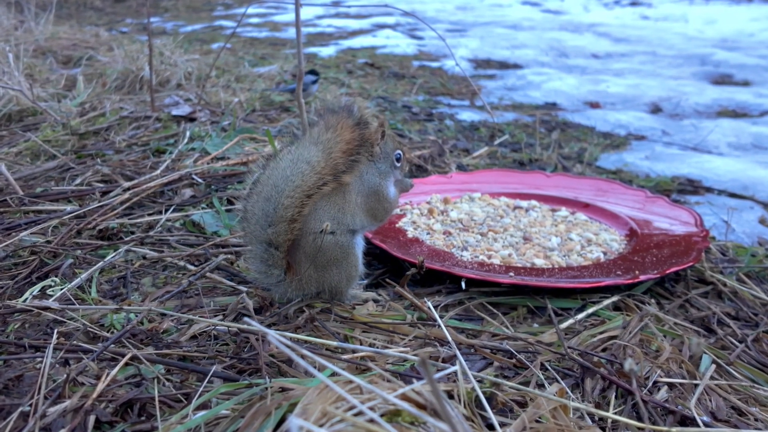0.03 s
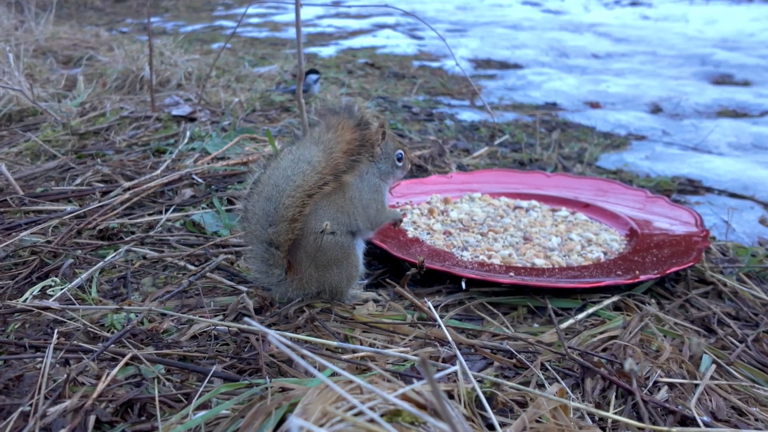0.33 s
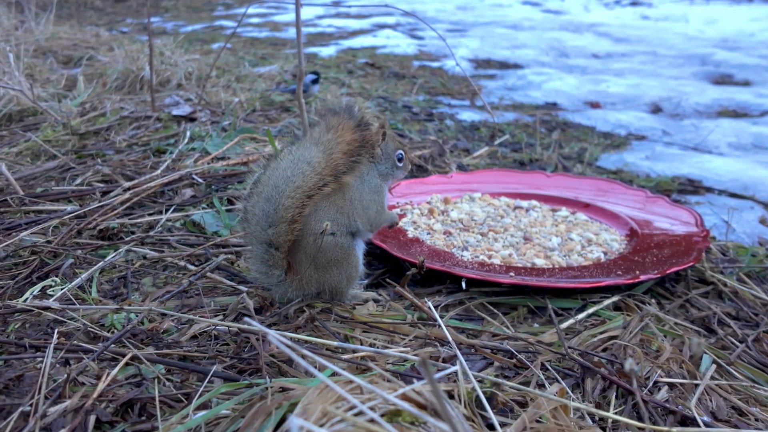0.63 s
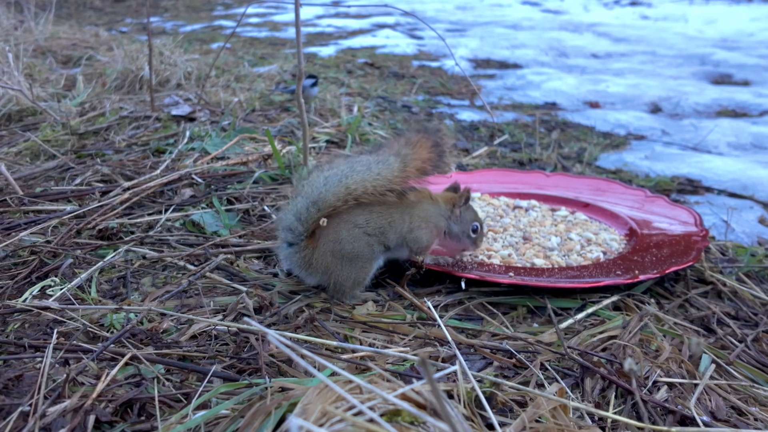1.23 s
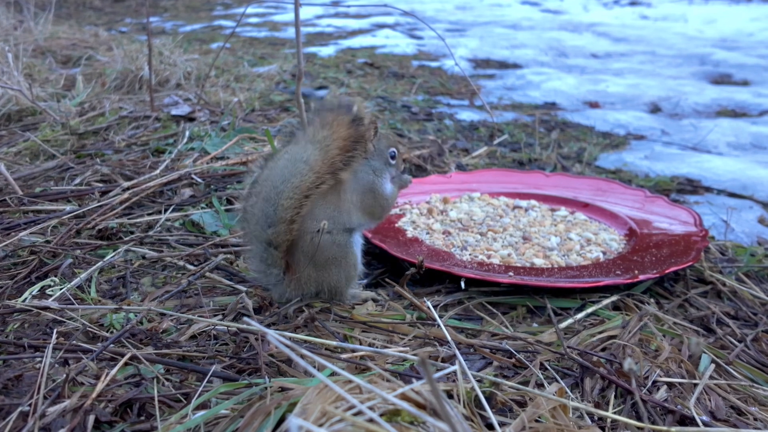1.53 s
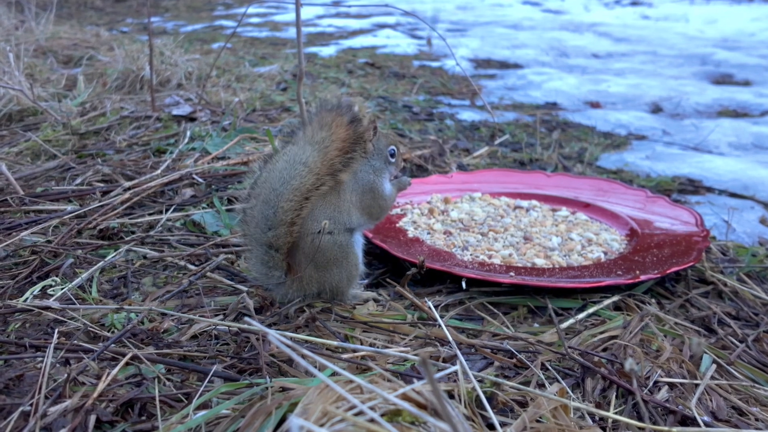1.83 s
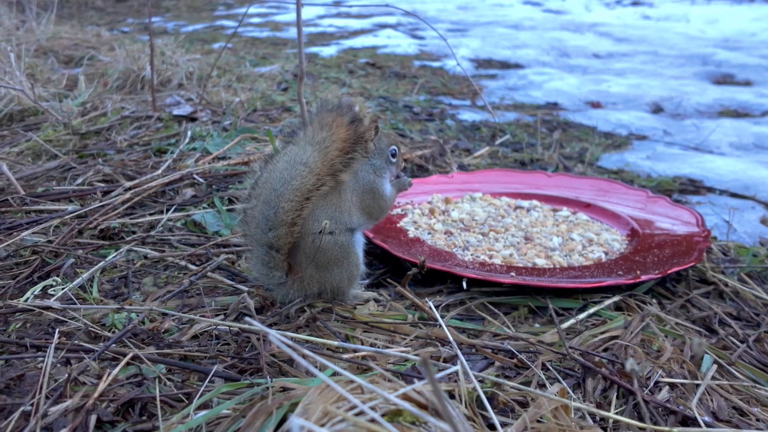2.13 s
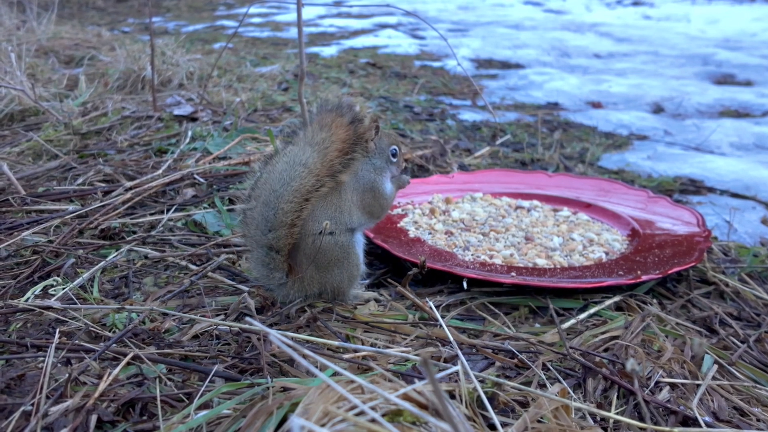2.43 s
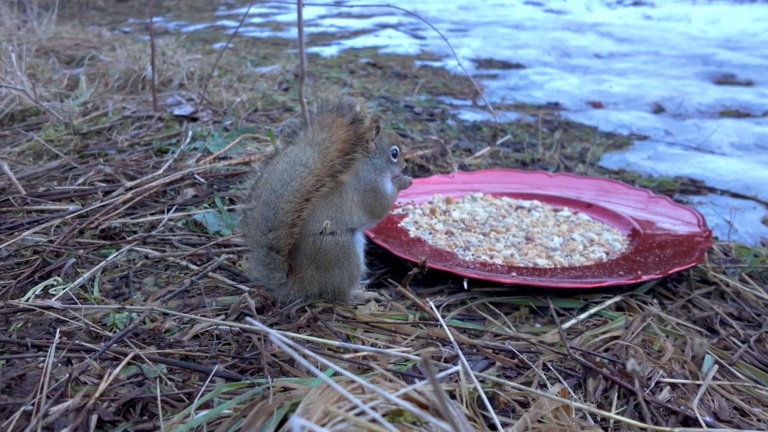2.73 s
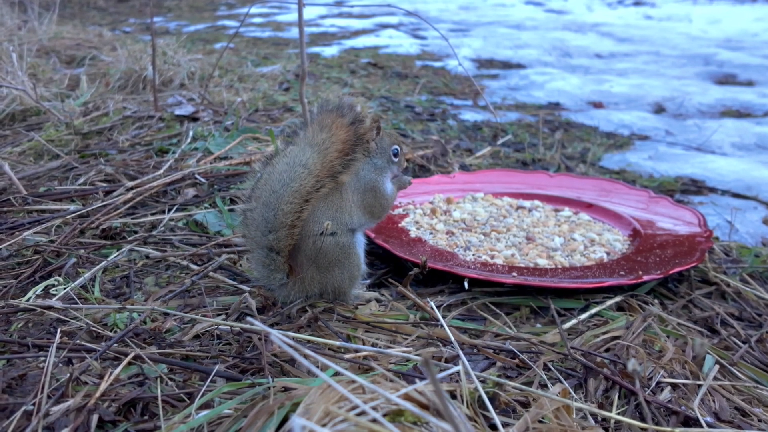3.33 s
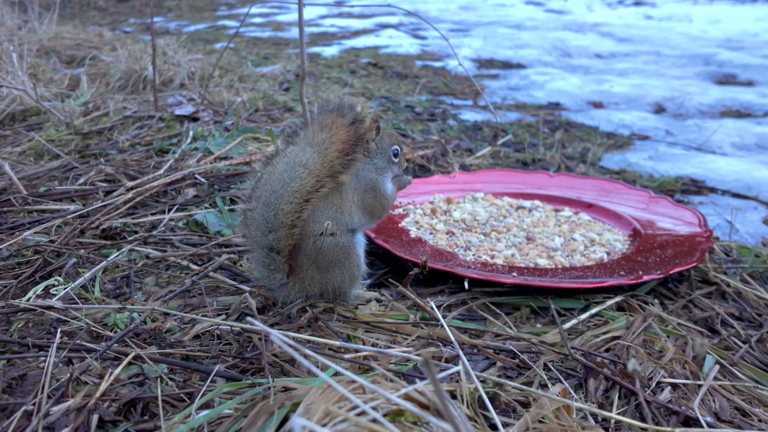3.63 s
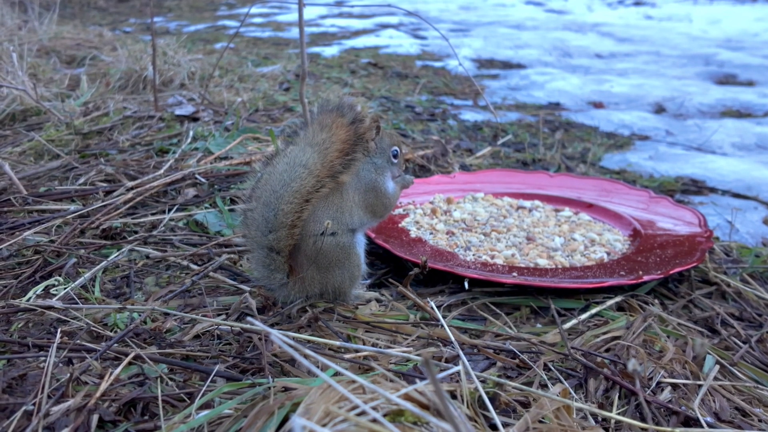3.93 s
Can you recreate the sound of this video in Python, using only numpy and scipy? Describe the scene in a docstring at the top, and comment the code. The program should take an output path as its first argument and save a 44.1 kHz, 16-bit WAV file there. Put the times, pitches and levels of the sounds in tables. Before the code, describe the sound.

A squirrel nibbles seeds with small, crisp clicks while thin bird whistles sound faintly outdoors.

```python
"""At a woodland edge, a squirrel eats seeds from a plastic dish. Husks snap and tick, shells split
with a tiny squeak and teeth rasp; paws brush dry grass and the body bumps softly on the ground.
Small birds whistle thin, high notes that rise and fall, one chips far off and one close by,
and the trunks scatter their calls. Under it all lie a distant rumble, a faint hum and a soft hiss."""
import sys
import numpy as np
from scipy import signal
from scipy.fft import rfft, irfft, next_fast_len
from scipy.io import wavfile
from scipy.ndimage import map_coordinates

SR = 44100
rng = np.random.default_rng(int(sys.argv[2]) if len(sys.argv) > 2 else 0)


def persist_wave(psi):
    """Save psi, clipped to +-1, as 16-bit WAV."""
    counts = np.round(np.clip(psi, -1, 1) * 32767).astype(np.int16)
    wavfile.write(sys.argv[1], SR, np.atleast_2d(counts).T)


N = 176400  # 4 seconds

# Husks snapping and teeth clicking as they gnaw. Each row: start in seconds, level in dB, pitch in Hz,
# brightness in dB.
BITE_TICKS = [(.4436, -46.5, 3400, -5), (.4549, -50, 3500, -12), (.494, -55, 3400, 1),
              (.6852, -57, 3390, 4), (0.8025, -54, 3470, 0), (.983, -57, 3400, 11),
              (1.1085, -52.5, 4600, -2), (1.1896, -47.5, 4930, -7), (1.579, -52.5, 3220, 0),
              (1.6563, -47.5, 3520, -6), (1.697, -57, 3450, 4), (1.756, -53, 2680, -1),
              (1.772, -49, 2540, -7), (1.811, -45, 3140, -9), (1.8485, -48, 2690, -12),
              (1.886, -48, 2920, -8), (2.043, -63, 3950, 17), (2.164, -46, 3360, 4.5),
              (2.359, -45.5, 3160, -9), (2.4495, -48.5, 3380, -9), (2.511, -61.5, 4000, 12),
              (2.5346, -48.5, 3300, -6), (2.713, -45.5, 3330, -3), (2.7223, -45.5, 3070, -1),
              (2.728, -48, 3080, 0), (2.746, -52, 3580, -9), (2.9332, -54, 3280, 6),
              (3.199, -53.5, 3460, 8), (3.4767, -53, 3000, -7), (3.5732, -42.5, 3300, -12),
              (3.6965, -38.5, 3220, -2), (3.78, -50.5, 3600, -6), (3.784, -49, 3640, -1),
              (3.797, -51, 3130, -4)]
# The tones a husk rings with. Each row: multiple of the pitch, level in dB, fade time in seconds.
# A tick's brightness then shifts the upper tones' levels and all the fade times.
HUSK_TONES = [(1, -1, 0.00022), (1.75, -5, 0.00015), (2.7, -8, 0.000058)]


def bite_ticks(crumb_count=64, crumbs_per_s=15):
    """A snapping husk or clicking tooth rings for a few cycles; sharper bites are shorter and wake its upper
    tones."""
    t, out = np.arange(SR // 40) / SR, np.zeros(N + SR)
    crumbs = []  # fainter ticks at random times
    for place, (loud, high, sharp) in zip(rng.random(crumb_count), rng.standard_normal((crumb_count, 3))):
        start = place * crumb_count / crumbs_per_s % (N / SR)
        crumbs.append((start, -61.5 + 1.5 * loud, 3300 * np.exp(0.092 * high), 3 * sharp - 4))
    for start, db, hz, bright_db in BITE_TICKS + crumbs:
        age = t * np.exp(bright_db / 57)  # brighter ticks die sooner
        ring = np.zeros(len(t))
        for k, (ratio, tone_db, fade_s) in enumerate(HUSK_TONES):
            gain = amp(tone_db + bright_db * (k > 0))
            envelope = (age / fade_s / 2) ** 2 * np.exp(2 - age / fade_s)
            ring += gain * envelope * np.sin(2 * np.pi * (hz * ratio * t + rng.random()))
        scatter = rng.standard_normal(len(t)) * np.exp(-t / .003)  # a short, noisy tail
        tail = np.convolve(ring, scatter / np.linalg.norm(scatter))[:len(t)]
        out[int(start * SR):][:len(t)] += amp(db) * (ring + .225 * tail)
    return out[:N]


# Shells splitting. Each row: start in seconds, length in seconds, level in dB.
SHELL_CRACKS = [(.499, 0.0071, -50.5), (.8555, .003, -64), (0.894, 0.005, -62.5), (2.591, 0.0068, -65)]
# A crack's colour (how strong its lows and highs are). Each row: frequency in Hz, boost or cut in dB.
CRACK_COLOUR = [(1200, -23), (2600, 4), (4300, 0.5), (7500, 0.5), (10300, 2.5), (12000, -8.5), (15500, -31)]


def shell_cracks(slip_hz=3220, slowing_s=0.0103, grit_db=-9):
    """A shell splits in a few milliseconds of rapid, slowing slips: a tiny falling squeak."""
    t, out = clock(), np.zeros(N)
    for start, length, db in SHELL_CRACKS:
        age = np.clip(t - start, 0, length)
        slip_rate = slip_hz * np.exp(-age / slowing_s) * (1 + .04 * wobble(900))
        phase = 2 * np.pi * np.cumsum(slip_rate) / SR
        slips = unit(sum(np.cos(k * phase) for k in range(1, 8)))  # one sharp pulse per slip
        grit = amp(grit_db) * rng.standard_normal(N)
        out += amp(db) * gate(start, start + length, 0.0012) * (slips + grit)
    return np.std(out) * coloured(out, CRACK_COLOUR)


# Strokes of the teeth. Each row: loudest moment in seconds, level in dB.
TOOTH_STROKES = [(1.657, -59), (1.696, -62), (1.731, -61), (1.773, -60), (1.812, -62), (1.849, -62.5),
                 (1.886, -66), (2.54, -62)]
# The colour of gnawing. Each row: frequency in Hz, boost or cut in dB.
TOOTH_COLOUR = [(1500, -2.5), (2100, -3.5), (3000, 0.5), (3700, 5.5), (4500, -10), (7000, -10.5),
                (11000, -17.5), (15500, -26)]


def gnawing():
    """Teeth rasp across a seed in quick, gritty strokes."""
    return strokes(TOOTH_STROKES, rise_s=0.0064, fall_s=0.0071) * gritty_noise(TOOTH_COLOUR)


# How loud the grass is over time. Each row: time in seconds, level in dB.
GRASS_LEVELS = [(1.5, -78), (1.65, -72), (1.78, -69), (1.88, -70), (1.97, -82), (3.2, -79), (3.8, -79),
                (3.88, -68.5), (3.94, -79)]
# The colour of dry grass. Each row: frequency in Hz, boost or cut in dB.
GRASS_COLOUR = [(1500, -4.5), (3200, 2), (4500, -5), (8000, -9), (15500, -13)]


def grass_rustle():
    """Dry grass rustles with a faint, grainy sound that swells and fades."""
    return amp(follow(GRASS_LEVELS)) * gritty_noise(GRASS_COLOUR)


# Strokes of the paws. Each row: loudest moment in seconds, level in dB.
PAW_STROKES = [(1.602, -65), (1.812, -61.5), (3.285, -58), (3.511, -56.5)]
# The colour of brushed stalks. Each row: frequency in Hz, boost or cut in dB.
PAW_COLOUR = [(800, -0.5), (2300, 1.5), (3300, -4), (5000, -13), (12000, -42)]


def paw_brushes():
    """Paws brush dry stalks in soft, short swishes."""
    return strokes(PAW_STROKES, rise_s=.005, fall_s=0.015) * noise(PAW_COLOUR)


# Soft bumps as the squirrel sits up. Each row: start in seconds, strength of the push in dB.
BODY_BUMPS = [(1.561, -30), (1.762, -31), (1.809, -32)]


def body_bumps(hz=290, fade_s=0.0023):
    """Each shift of weight gives the ground one dull push that dies away at once."""
    out = np.zeros(N)
    for start, db in BODY_BUMPS:
        age = np.maximum(clock() - start, 0)
        phase = 2 * np.pi * hz * age
        envelope = (1 - np.exp(-phase)) * np.exp(-age / fade_s)
        out -= amp(db) * envelope * np.sin(phase)
    return out


# The colour of a body settling on turf. Each row: frequency in Hz, boost or cut in dB.
SHUFFLE_COLOUR = [(130, 0), (300, 4), (700, -5), (1300, -26)]


def shuffle(loudest_s=1.78, width_s=0.072, db=-53.5):
    """A brief, dull swell as the squirrel settles on its haunches."""
    swell = np.exp(-((clock() - loudest_s) / width_s) ** 2 / 2)
    return amp(db) * swell * noise(SHUFFLE_COLOUR)


# Thin bird whistles. Each row: start, highest point and end in seconds, the pitch at those three
# times in Hz, loudest moment in seconds, level there in dB, drop from there to the end in dB.
BIRD_WHISTLES = [(.24, .52, .69, 6850, 7200, 6880, .6, -68.5, 9),
                 (.74, .91, 1.09, 6550, 7170, 6900, 1.02, -70, 7),
                 (1.07, 1.24, 1.4, 6400, 6990, 6850, 1.24, -71, 8),
                 (1.61, 1.82, 1.93, 6330, 6910, 6700, 1.88, -64, 8),
                 (2.02, 2.21, 2.385, 6350, 6710, 6680, 2.18, -68.5, 4),
                 (2.8, 3.52, 3.6, 6800, 7190, 7100, 3.42, -70.5, 10),
                 (3.26, 3.5, 3.77, 6720, 6910, 6540, 3.35, -71.5, 5),
                 (3.7, 3.9, 4.1, 6350, 6880, 6760, 3.86, -70.5, 5)]


def bird_whistles(swell_db=16.5, fade_in_s=0.092, waver_hz=34.4, flutter_db=1):
    """Each whistle rises and falls in pitch while it comes in softly, swells, sinks and stops."""
    t, out = clock(), np.zeros(N)
    for start, crest, end, start_hz, top_hz, end_hz, loudest, db, fall_db in BIRD_WHISTLES:
        from_crest = np.interp(t, [start, crest, end], [1, 0, 1])
        low_hz = np.where(t < crest, start_hz, end_hz)
        hz = top_hz + (low_hz - top_hz) * from_crest ** 1.7
        level = db - np.interp(t, [start, loudest, end], [swell_db, 0, fall_db])
        envelope = np.clip((t - start) / fade_in_s, 0, 1) * gate(start, end, 0.016)
        out += envelope * bird_tone(hz + waver_hz * wobble(70), level + flutter_db * wobble(45))
    return out


# The path of one far chip and one near chip. Each row: time in seconds, pitch in Hz, level in dB.
FAR_CHIP = [(1.425, 6250, -75), (1.438, 6850, -65), (1.455, 7260, -66.5), (1.475, 7320, -74),
            (1.5, 7300, -78)]
NEAR_CHIP = [(3.491, 6800, -64), (3.497, 7320, -51), (3.515, 7670, -40.5), (3.528, 7930, -46),
             (3.532, 7400, -44.5), (3.5355, 5500, -50), (3.539, 4530, -58), (3.543, 4400, -66)]


def bird_chip(rows):
    """A bird sweeps its pitch quickly through one very short call."""
    times, hz, db = np.transpose(rows)
    note = bird_tone(np.interp(clock(), times, hz), np.interp(clock(), times, db))
    return gate(times[0], times[-1], 0.0018) * note


def bird_tone(hz, db, overtone_db=-50):
    """A bird's nearly pure note, with a faint overtone an octave up."""
    phase = 2 * np.pi * np.cumsum(hz) / SR
    return np.sqrt(2) * amp(db) * (np.sin(phase) + amp(overtone_db) * np.sin(2 * phase))


def tree_echo(x, ring_s=0.44, delay_s=.02):
    """The trees send back a blurred echo that fades by 60 dB in ring_s."""
    t = np.arange(SR) / SR
    tail = rng.standard_normal(SR) * amp(-60 * t / ring_s) * (t > delay_s)
    return signal.fftconvolve(x, tail / np.linalg.norm(tail))[:N]


def trunk_echoes(x, count=160, spread_s=.036):
    """Many weak, early echoes bounce off the ground and near trunks, the later ones fainter."""
    lateness, strength = rng.uniform(.12, 1, count), rng.standard_normal(count)
    echoes = np.bincount((lateness * spread_s * SR).astype(int), strength * np.exp(-lateness))
    return signal.fftconvolve(x, unit(echoes) / np.sqrt(len(echoes)))[:N]


# The tones of the hum. Each row: pitch in Hz, level in dB, speed of its wavering in Hz.
HUM_TONES = [(72.9, -57.5, 8), (288.6, -61.5, 6), (1276, -79, 6.3)]
# The slow drift of the rumble. Each row: time in seconds, level in dB.
RUMBLE_LEVELS = [(0, -47), (.55, -46.5), (1.35, -48), (2.2, -47.5), (3.2, -47.5), (4, -48)]
# The colours of the rumble and the hiss. Each row: frequency in Hz, boost or cut in dB.
RUMBLE_COLOUR = [(20, -31), (38, -11.5), (52, -7), (66, -1.5), (90, -3), (135, -2.5), (200, -5.5),
                 (400, -11), (650, -13.5), (950, -19), (1300, -27), (1700, -40)]
HISS_COLOUR = [(1000, -6), (1600, 4), (3400, -5), (4500, -7), (6500, -7), (9000, -11.5), (15500, -13.5)]


def background(drift_db=0.22, hiss_db=-70.5):
    """A low, distant rumble drifts in level beside a wavering hum and a soft hiss."""
    hum = np.zeros(N)
    for hz, db, waver_hz in HUM_TONES:
        waver = wobble(waver_hz) + 1j * wobble(waver_hz)  # unsteady in both level and pitch
        hum += amp(db) * unit(np.real(waver * np.exp(2j * np.pi * hz * clock())))
    rumble = amp(follow(RUMBLE_LEVELS) - drift_db * wobble(2.43)) * noise(RUMBLE_COLOUR)
    return rumble + hum + amp(hiss_db) * noise(HISS_COLOUR)


def amp(db):
    """Turn decibels into a number to multiply by."""
    return 10 ** (np.asarray(db) / 20)


def unit(x):
    """Scale x to an average (rms) level of 1."""
    return x / np.sqrt(np.mean(x ** 2) + 1e-20)


def clock():
    """The time of every sample, in seconds."""
    return np.arange(N) / SR


def follow(rows):
    """Join (time, value) points with straight lines."""
    return np.interp(clock(), *np.transpose(rows))


def wobble(rate):
    """A smooth curve through `rate` random points a second."""
    return map_coordinates(rng.standard_normal(4000), [clock() * rate], mode="wrap")


def gate(start, end, edge_s):
    """On between start and end, with soft edges."""
    t = clock()
    return np.sin(np.pi / 2 * np.clip(np.minimum(t - start, end - t) / edge_s + .5, 0, 1)) ** 2


def strokes(rows, rise_s, fall_s):
    """The loudness of a series of quick strokes, each rising to a peak and fading."""
    t = clock()
    return sum(amp(db) * np.exp(-np.maximum((peak - t) / rise_s, (t - peak) / fall_s)) for peak, db in rows)


def filtered(x, gain):
    """Turn each frequency in x up or down by gain(hz)."""
    size = next_fast_len(N + 8192)
    return irfft(rfft(x, size) * gain(np.fft.rfftfreq(size, 1 / SR)), size)[:N]


def coloured(x, colour):
    """Shape x with a colour table, fading out beyond its ends; the result has level 1."""
    points_hz, db = np.transpose(colour)

    def gain(hz):
        high_cut = 1 / (1 + (hz / points_hz[-1] / 2) ** 6)
        low_cut = 1 / (1 + (points_hz[0] / 2 / (hz + 1)) ** 4)
        return high_cut * low_cut * amp(np.interp(np.log(hz + 1), np.log(points_hz), db))
    return unit(filtered(x, gain))


def noise(colour):
    """Steady noise of the given colour."""
    return coloured(rng.standard_normal(N), colour)


def gritty_noise(colour, grain_db=5):
    """Noise whose level flickers so fast that it sounds grainy."""
    return unit(noise(colour) * amp(grain_db * np.clip(wobble(900), -2, 2)))


def scene():
    """Far birds echo a lot, the near bird less and the squirrel not at all."""
    backdrop = background()
    far, near = bird_whistles() + bird_chip(FAR_CHIP), bird_chip(NEAR_CHIP)
    echoes = amp(-5) * tree_echo(far) + amp(-18) * tree_echo(near) + amp(-8) * trunk_echoes(near + far)
    eating = bite_ticks() + shell_cracks() + gnawing()
    moving = grass_rustle() + paw_brushes() + body_bumps() + shuffle()
    return (eating + moving + far + near + echoes + backdrop)[None]


def record(dry, top_hz=15780):
    """Cut away the very highest treble, above top_hz."""
    return filtered(dry[0], lambda hz: hz < top_hz)[None]


dry = scene()
out = record(dry)
persist_wave(out)
```